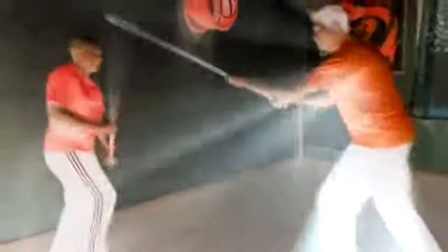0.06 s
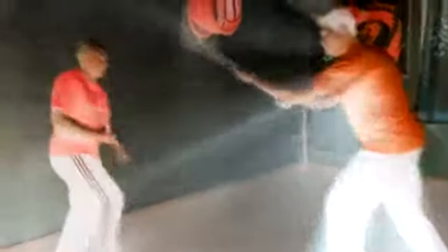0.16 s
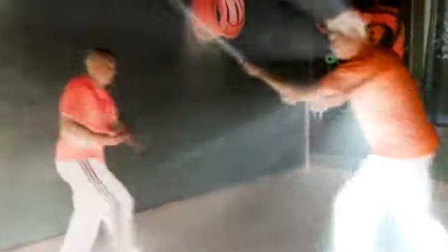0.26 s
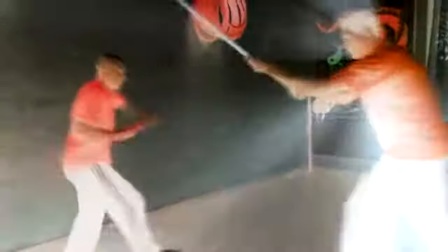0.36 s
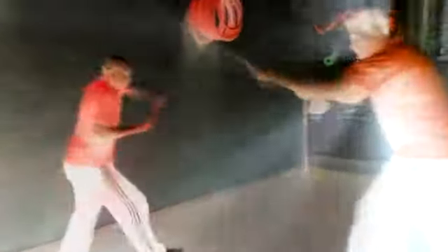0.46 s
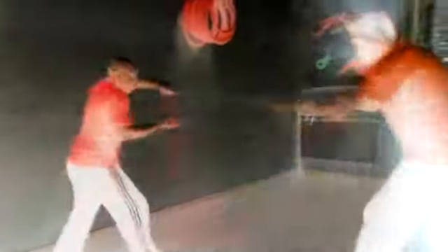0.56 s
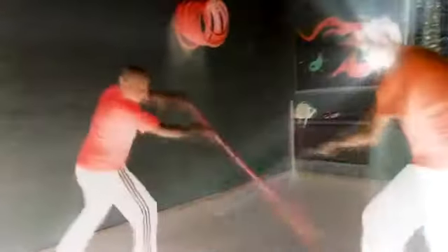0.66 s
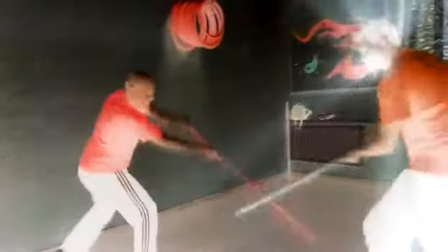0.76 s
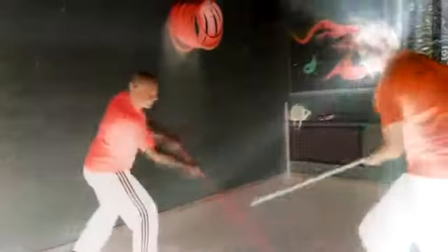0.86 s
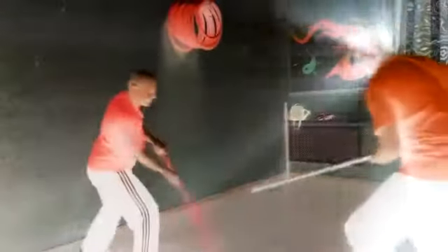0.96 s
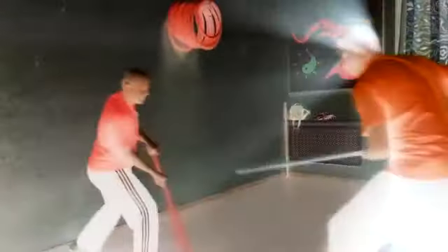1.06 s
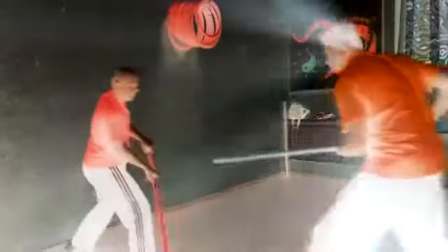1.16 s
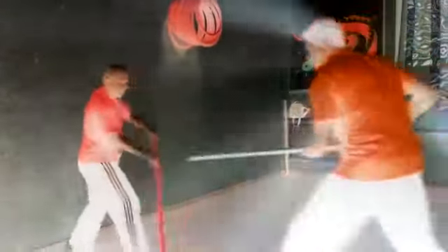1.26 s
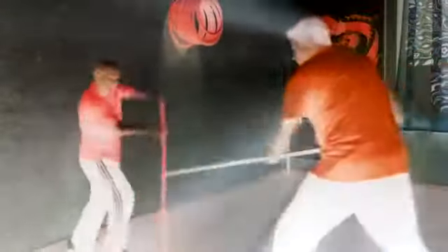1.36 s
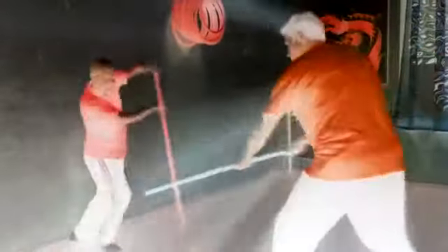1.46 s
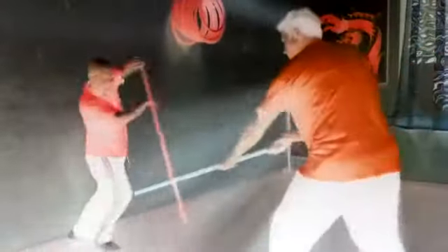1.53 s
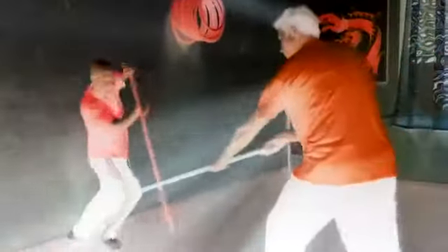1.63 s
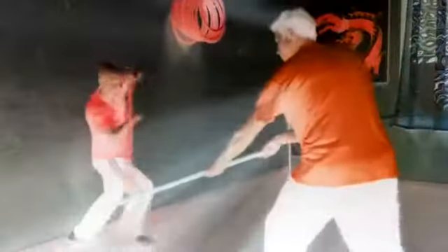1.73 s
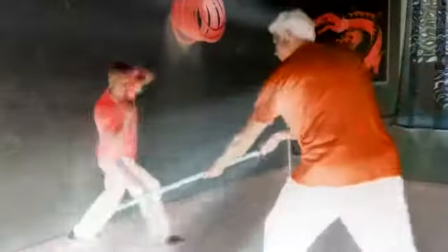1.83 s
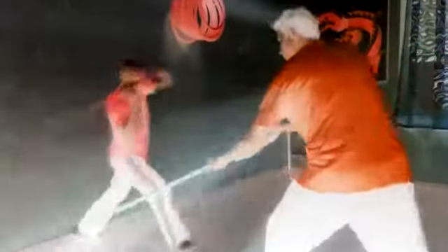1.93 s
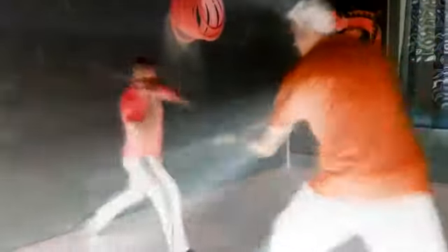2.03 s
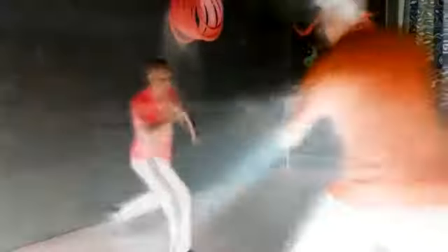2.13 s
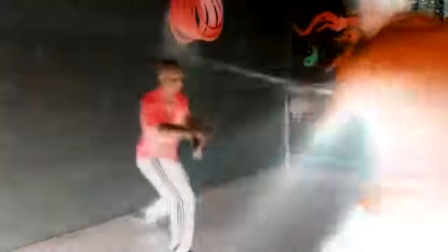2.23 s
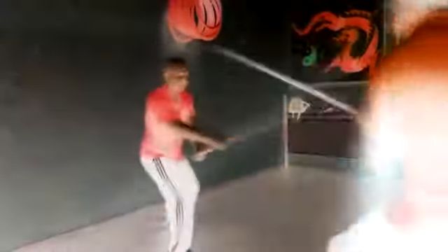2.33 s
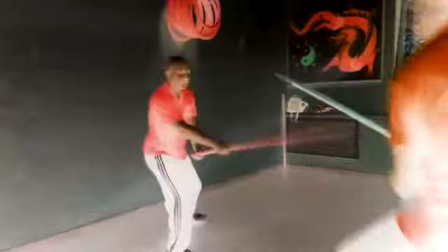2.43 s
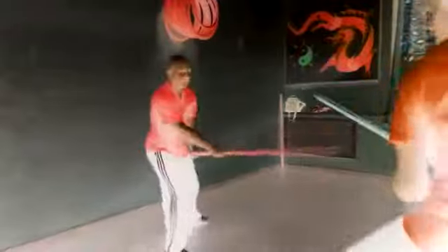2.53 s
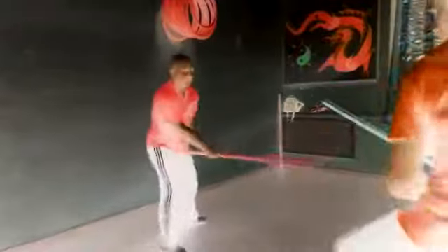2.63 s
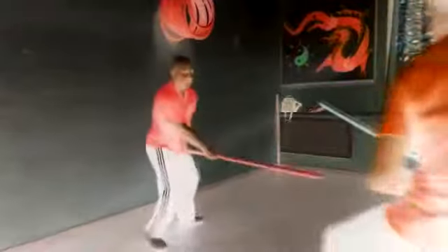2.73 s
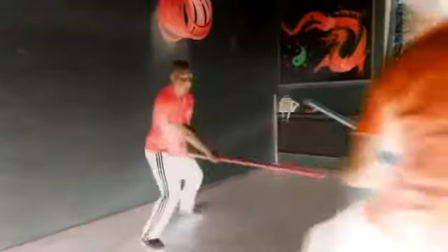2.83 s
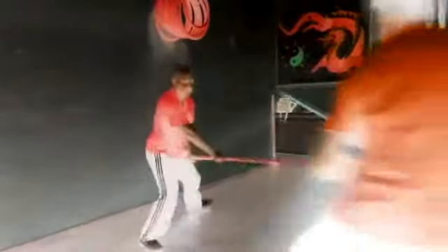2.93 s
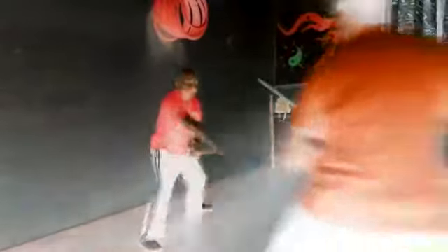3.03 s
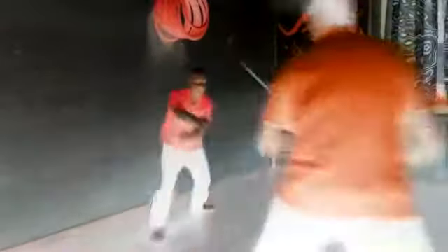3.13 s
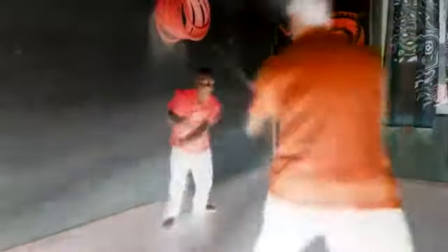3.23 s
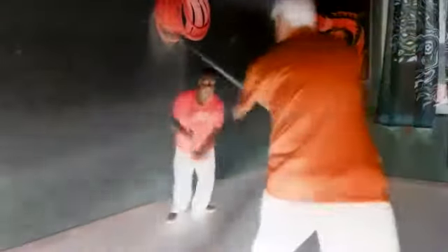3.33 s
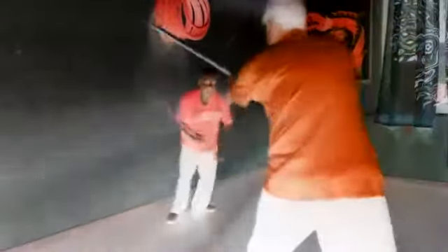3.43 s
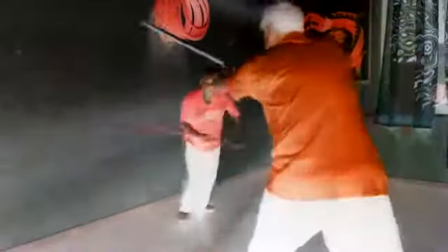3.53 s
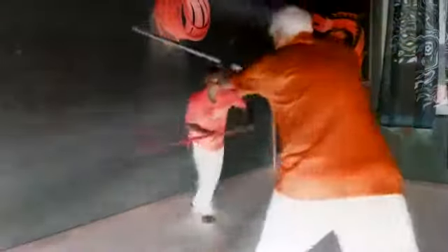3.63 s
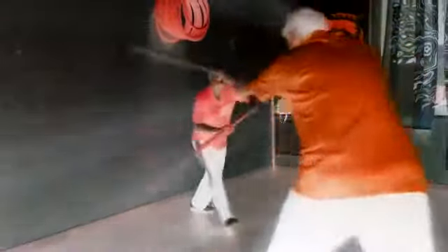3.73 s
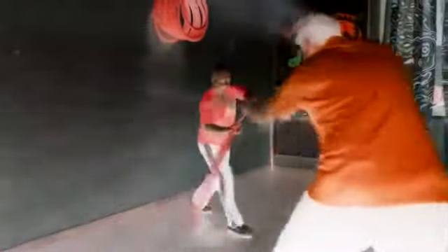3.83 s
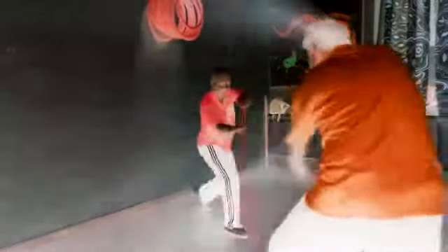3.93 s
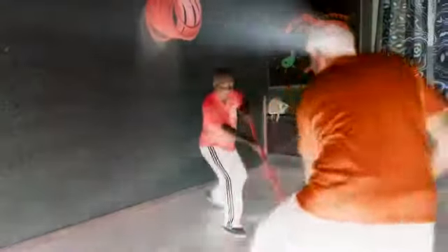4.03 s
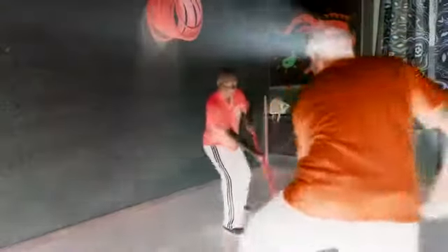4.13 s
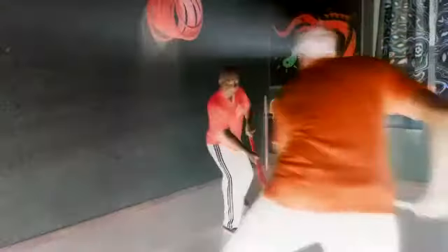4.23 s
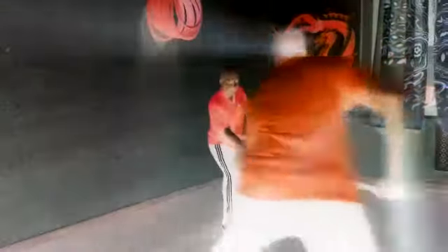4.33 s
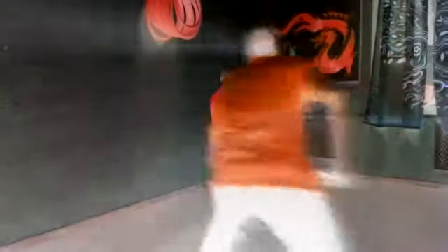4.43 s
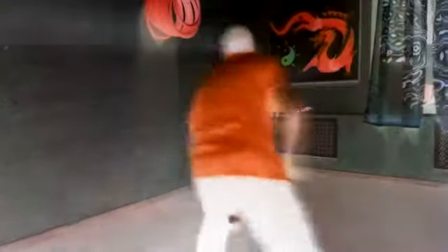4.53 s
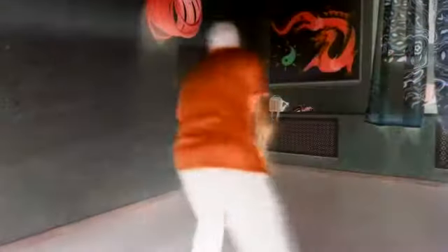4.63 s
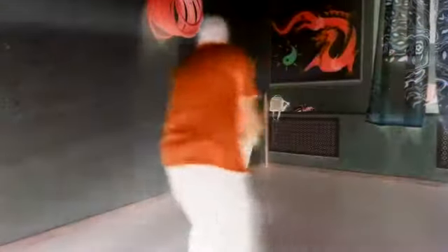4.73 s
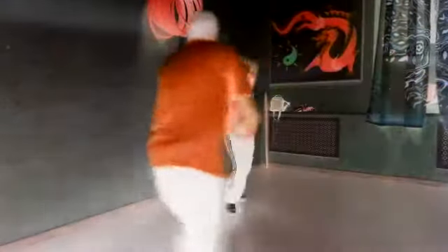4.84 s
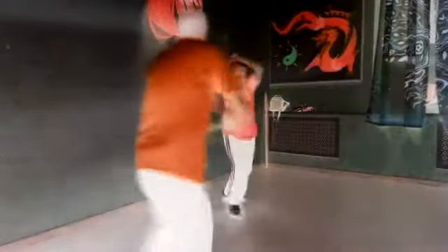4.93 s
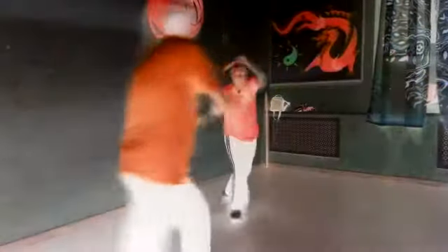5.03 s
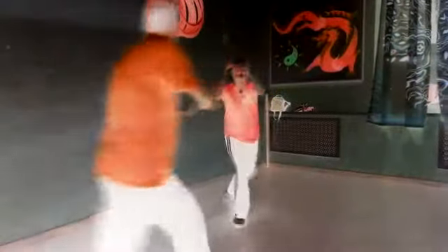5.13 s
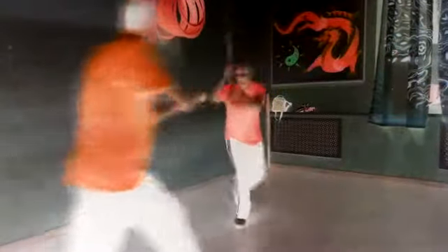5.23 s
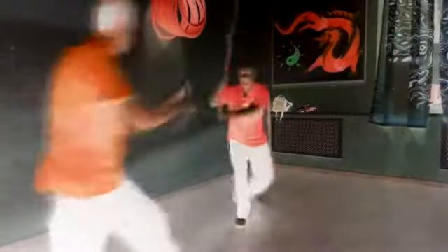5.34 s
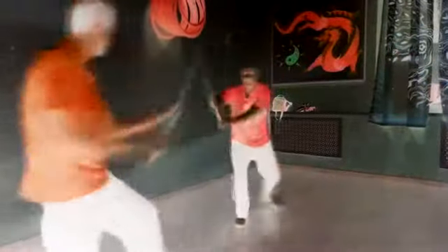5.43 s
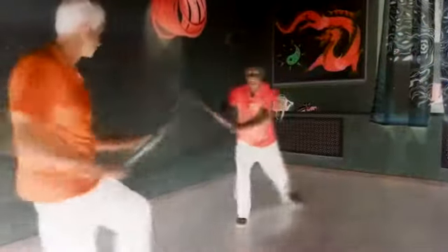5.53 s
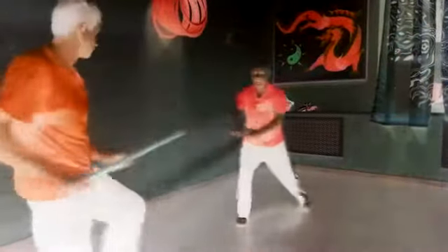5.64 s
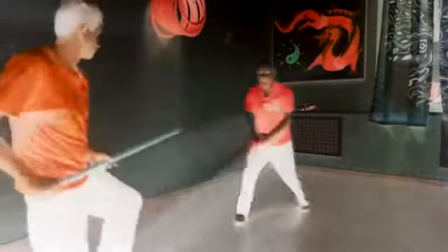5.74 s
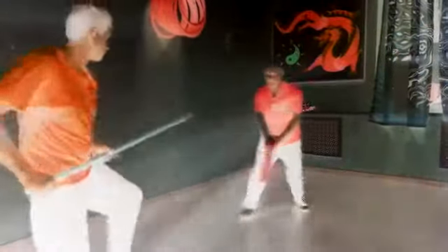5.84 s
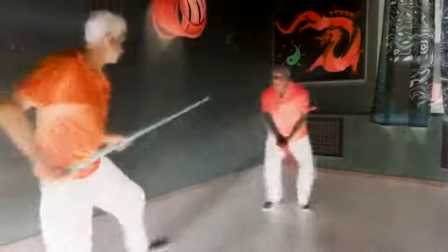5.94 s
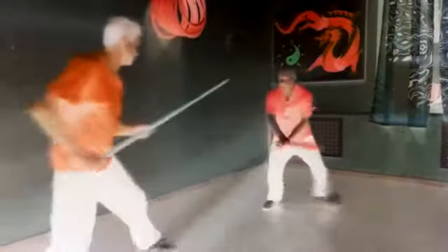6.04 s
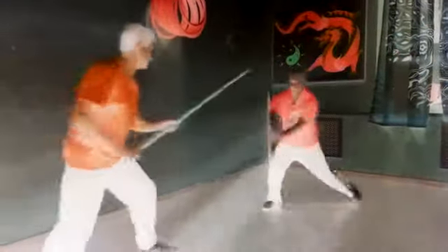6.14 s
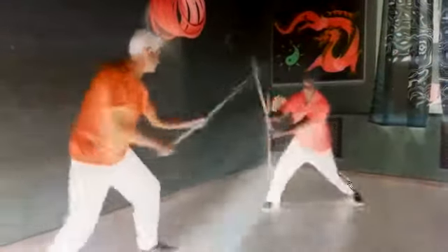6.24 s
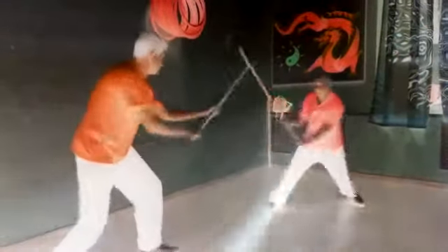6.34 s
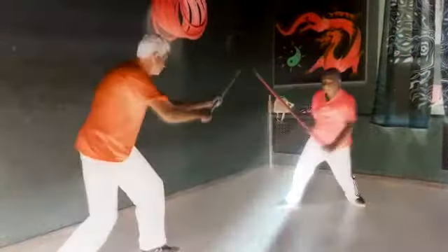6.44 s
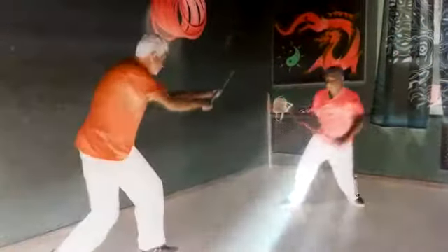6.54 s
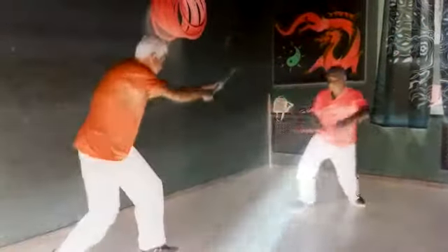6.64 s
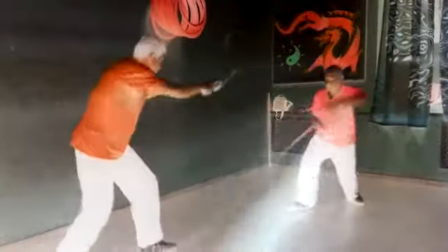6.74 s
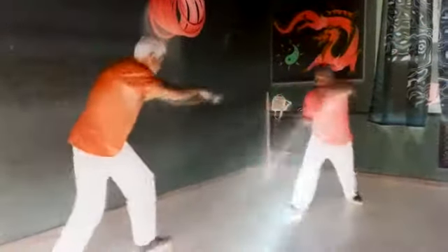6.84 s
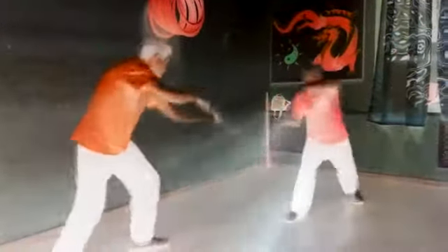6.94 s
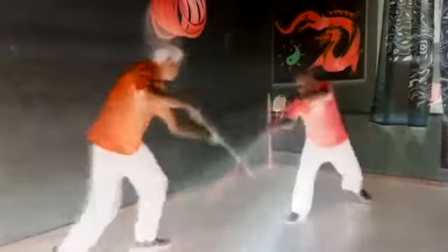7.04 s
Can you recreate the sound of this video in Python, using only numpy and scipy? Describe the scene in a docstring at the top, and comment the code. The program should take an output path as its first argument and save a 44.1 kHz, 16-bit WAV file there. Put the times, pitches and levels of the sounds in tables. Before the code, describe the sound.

Two people spar with long wooden sticks in a hard-walled hall, heard almost in mono over a very quiet background. At the start the room is already ringing from a block, and two lighter clacks follow at about 0.7 and 0.9 seconds. From 1 second, rubber soles pat, stamp and squeak on the smooth floor, mixed with faint sliding and swishes of cloth. Six hard, sharp stick blows land at roughly 2.3, 3.3, 4.0, 4.8, 5.5 and 6.3 seconds, each a bright wooden crack with a short reverberant tail; the last is slightly the strongest. Brief, high shoe chirps cluster between the blows and are loudest around 4 seconds, with a heavier stamp at 4.2. More steps and squeaks come near 5.2 and 6 seconds. A few final squeaks around 6.5 seconds and a soft step at 7 end the bout.

```python
"""Two people spar with long wooden sticks in a hard-walled hall, heard almost in mono.
The hall is already ringing from a block; two light clacks follow as feet slide and cloth swishes.
From 1 s rubber soles squeak by stick-slip friction and stamp on the smooth floor.
Between 2.3 and 6.3 s six hard blows excite the sticks' bending modes, each followed by reverberation;
the squeaks peak near 4 s. A few more squeaks and a soft step end the bout."""
import sys
import numpy as np
from scipy import signal
from scipy.io import wavfile
from scipy.ndimage import uniform_filter1d

SR = 44100
rng = np.random.default_rng(int(sys.argv[2]) if len(sys.argv) > 2 else 0)


def file_out(sig):
    """Save sig as 16-bit WAV at sys.argv[1]."""
    # one column per channel
    cols = np.atleast_2d(sig).T
    # limit, then scale
    lim = np.clip(cols, -1, 1)
    pcm = np.round(lim * 32767).astype(np.int16)
    wavfile.write(sys.argv[1], SR, pcm)


N = 312669
LEAD = SR // 4  # samples before time zero: the sparring is already under way

# background of the still room: (frequency [Hz], relative level [dB])
AIR_SPECTRUM = [(30, -5), (130, 0.5), (400, 7), (2000, -5.5), (4000, 2), (13000, -24)]
# stick on stick: (time [s], direct level [dB], hall level [dB], body below 1 kHz [dB],
# hardness near 3-6 kHz [dB], sizzle above 9 kHz [dB], knock centre [Hz], time the tail stays level [s])
BLOWS = [ (-0.055, -21, 1, 4, 2.5, 5, 2670, 0.091), (0.709, -10.5, 0, 0, 2.5, 7.5, 1920, 0.097),
         (0.933, -10, -15, -5, 8.5, -13, 2530, .01), (2.331, 2, 2, 0.5, -5.5, 2, 2040, 0.14),
         (3.256, 3.5, 6.5, -3, 7.5, 1, 2520, 0.088), (4.044, -1, 6, 1, 8, 9.5, 2300, 0.059),
         (4.751, 0.5, 5.5, .5, 9, 0.5, 2160, 0.039), (5.497, 2.5, 4.5, 0.5, -0.5, 5.5, 1540, 0.079),
         (6.321, 5, 7, -1, 8, -1, 2145, 0.05)]
# bending modes of the sticks: (frequency [Hz], relative level [dB])
BENDING_MODES = [(560, -29.5), (860, -6.5), (1110, -12), (1440, -2), (1660, 0), (1940, -4), (2330, 0),
                 (2580, -1)]
# contact pulse of wood on wood: (frequency [Hz], relative level [dB])
SNAP_SPECTRUM = [(40, -29.5), (150, -42), (280, -15.5), (600, -8.5), (1100, -3), (1600, 3), (2300, 4.5),
                 (3000, -8), (3800, -12), (5200, -12.5), (7200, -8), (9500, -20), (12000, -36),
                 (14000, -51)]
# first echoes off walls and ceiling: (delay [s], relative level [dB])
WALL_ECHOES = [(.0065, -3.5), (.0098, -2), (0.0216, -5), (.033, -4), (.043, -3)]
# decay of the hall before the extra fade of the highest treble: (frequency [Hz], time to fall 60 dB [s])
HALL_DECAY = [(150, 1.2), (300, 1.08), (700, 0.76), (1800, 0.53), (2600, 0.47), (4600, 0.47), (8000, 0.43),
              (13000, 0.57)]
# feet sliding with a swish of cloth: (start [s], duration [s], level [dB])
SLIDE_STROKES = [(0.654, 0.12, -66), (0.84, 0.26, -54), (1.3, 0.38, -46.5), (1.801, 0.13, -54),
                 (2.442, 0.17, -45), (3.068, 0.33, -54), (3.85, 0.17, -61), (4.505, 0.37, -55),
                 (5.274, 0.19, -59), (5.821, 0.46, -50.5), (6.504, 0.3, -60)]
# friction noise of feet and cloth: (frequency [Hz], relative level [dB])
SWISH_SPECTRUM = [(40, -42.5), (150, -28.5), (280, -4), (500, -2), (850, 9), (1200, 5.5), (2200, 9),
                  (3200, -23), (5000, -24.5), (8000, -34.5), (13000, -49.5)]
# soles sticking and slipping:
# (start [s], duration [s], first pitch [Hz], last pitch [Hz], level [dB], bite [0-1])
SOLE_SLIPS = [ (1.03, .013, 2120, 2010, -34.5, 0.63), (1.523, 0.084, 2200, 2397, -41, 0.66),
              (1.707, 0.0063, 2010, 1790, -37, 0), (2.573, .014, 2068, 2437, -30, 0.59),
              (2.583, 0.013, 2425, 2357, -30.5, 0.6), (2.719, 0.011, 2426, 2370, -34, 0.67),
              (2.796, .034, 1727, 1937, -34.5, 0.89), (2.819, 0.023, 1968, 2435, -27.5, 0.86),
              (3.18, .01, 2320, 2440, -45.5, .45), (3.201, 0.025, 3160, 2540, -42, 0.61),
              (3.221, 0.065, 2332, 2628, -29.5, 0.79), (3.328, 0.063, 1644, 1803, -25.5, 0.79),
              (3.378, 0.038, 2530, 2560, -18.5, 0.69), (3.385, 0.057, 1784, 1916, -26, .72),
              (3.78, 0.019, 2380, 2193, -36, 0.42), (3.989, 0.023, 1975, 1854, -20.5, 0.1),
              (4.003, 0.029, 1966, 1818, -13.5, 0.27), (4.019, 0.031, 2233, 2210, -26.5, 0.7),
              (4.235, 0.03, 2124, 2317, -16.5, 0.66), (4.239, 0.016, 1690, 1672, -30, 0.79),
              (4.641, .077, 2760, 2470, -32, 0.58), (4.673, 0.052, 2373, 2055, -35.5, .85),
              (5.168, 0.03, 1680, 1494, -42, 0.58), (5.318, 0.02, 1143, 1007, -47.5, .2),
              (5.885, 0.013, 2626, 2330, -41.5, 0.68), (5.967, .017, 2370, 2700, -34.5, 0.58),
              (5.978, 0.047, 2174, 1875, -32.5, 0.58), (6.017, 0.025, 2902, 3173, -32, 0.68),
              (6.029, 0.038, 2322, 2867, -28, .95), (6.498, 0.031, 2420, 2290, -31, 0.53),
              (6.522, 0.017, 2774, 2473, -24.5, 0.43), (6.538, 0.033, 2102, 1907, -30, 0.53),
              (6.614, 0.028, 1893, 1873, -37, .52), (7.007, 0.013, 2085, 1820, -51.5, 0.07)]
# scrape of a chattering sole: (frequency [Hz], relative level [dB])
RASP_SPECTRUM = [(100, -42.5), (600, -10), (1300, -16.5), (2200, 7.5), (3300, -27.5), (4700, -2.5),
                 (6000, -22.5), (7500, -23), (13000, -53.5)]
# landings, flatness negative on the heel and positive on the sole: (time [s], level [dB], flatness [dB])
FOOTFALLS = [(1.097, -17, -8.5), (1.226, -19.5, -1.5), (1.315, -18.5, -3), (1.735, -27, -14),
             (1.889, -27, 0), (2.047, -28, -1), (2.118, -18.5, 3.5), (2.201, -24.5, -1.5),
             (3.05, -25.5, -8), (3.76, -24.5, 1), (3.961, -20, 9.5), (4.2, -9, -3.5), (4.479, -17, -3.5),
             (5.192, -15, 8.5), (5.222, -18.5, 4), (5.767, -22.5, 1), (5.953, -21, 3.5), (6.263, -17, -5.5),
             (7.053, -29, 1.5)]
# impact of a sole on the floor: (frequency [Hz], relative level [dB])
SOLE_SPECTRUM = [(40, -26), (140, -18), (200, -7.5), (300, 5), (550, 5.5), (850, 10.5), (1300, 5),
                 (2200, 6), (3200, -24.5), (7000, -33.5), (13000, -60.5)]


def amp(db):
    """Amplitude grows tenfold for every 20 dB."""
    return 10 ** (np.asarray(db) / 20)


def unit(x):
    """Normalisation to an energy of 1."""
    return x / np.sqrt(np.sum(x ** 2) + 1e-20)


def curve(points, hz):
    """Interpolation of a table on a logarithmic frequency axis."""
    table_hz, value = np.transpose(points)
    return np.interp(np.log(hz + 1), np.log(table_hz + 1), value)


def shelf(hz, corner_hz):
    """A high-pass transition from 0 below the corner to 1 above it."""
    return 1 - 1 / (1 + (hz / corner_hz) ** 8)


def pulse(spectrum_db, size=2048):
    """Minimum phase gives the most compact causal pulse with a given spectrum."""
    log_gain = np.log(amp(spectrum_db(abs(np.fft.fftfreq(size, 1 / SR)))))
    return np.fft.ifft(np.exp(np.conj(signal.hilbert(log_gain)))).real


def noise(spectrum):
    """Linear filtering colours white noise and keeps its rms near 1."""
    colour = unit(pulse(lambda hz: curve(spectrum, hz)))
    return signal.oaconvolve(rng.standard_normal(N + LEAD), colour, "same")


def still_air(level_db=-102.5):
    """Stationary noise forms the faint background of the room."""
    return amp(level_db) * noise(AIR_SPECTRUM)


def stick_clacks(ring_t60_s=.035, chatter_s=.002, knock_db=2, mellow_db=-4, size=4096):
    """Impact excites bending modes, which vary with the grip and the point of contact."""
    out, t = np.zeros(N + LEAD), np.arange(size) / SR
    mode_hz, mode_db = np.transpose(BENDING_MODES)[:, :, None]
    damping = amp(-60 * t / ring_t60_s)
    radiation = signal.butter(2, 420, "high", fs=SR)  # the ring of the modes carries little bass
    snap = unit(pulse(lambda hz: curve(SNAP_SPECTRUM, hz), size=size))
    # less of the 3-6 kHz band travels straight to the listener than into the hall
    mellow = pulse(lambda hz: mellow_db * (shelf(hz, 2900) - shelf(hz, 5800)))
    for start, direct_db, hall_db, body_db, hard_db, sizzle_db, knock_hz, plateau_s in BLOWS:
        grip, place = rng.standard_normal((2, len(mode_hz), 1))
        modes = np.sign(place) * amp(mode_db) * np.sin(2 * np.pi * mode_hz * (1 + .03 * grip) * t)
        ring = signal.lfilter(*radiation, unit(damping * modes.sum(0)))
        contacts = rng.standard_normal(size) * np.exp(-t / chatter_s)
        chatter = unit(signal.fftconvolve(snap, contacts)[:size])
        crack_db = .45 * hard_db  # part of the hardness reaches 6-9 kHz
        colour = pulse(lambda hz: body_db * (1 - shelf(hz, 1000))
                       + knock_db * np.exp(-((hz - knock_hz) / 300) ** 2)
                       + hard_db * shelf(hz, 2600)
                       + (crack_db - hard_db) * shelf(hz, 5800)
                       + (sizzle_db - crack_db) * shelf(hz, 8800))
        direct = signal.fftconvolve(unit(snap + amp(-7) * chatter + amp(-1) * ring), colour)
        direct = signal.fftconvolve(direct, mellow)
        # the hall gathers sound from all directions, so single modes stand out less
        scattered = signal.fftconvolve(unit(snap + amp(-10) * ring), colour)
        add(out, start, amp(direct_db) * early_reflections(direct))
        add(out, start, amp(hall_db) * reverberation(scattered, plateau_s, gap_s=.009))
    return out


def early_reflections(x, floor_s=.0026, floor_db=-3, dull_hz=2800):
    """Multipath propagation: the direct sound, a floor bounce and duller echoes from the walls."""
    delay_s, level_db = np.transpose(WALL_ECHOES)
    stretch = rng.uniform(.94, 1.06, len(WALL_ECHOES) + 1)  # paths shift as the players move
    taps = np.zeros(SR // 10)
    taps[(delay_s * stretch[1:] * SR).astype(int)] = amp(level_db)
    taps = signal.lfilter(*signal.butter(2, dull_hz, fs=SR), taps)
    taps[0] = 1
    taps[int(floor_s * SR * stretch[0])] += amp(floor_db)
    return signal.fftconvolve(x, unit(taps))


def reverberation(x, plateau_s, gap_s=.0057, early_db=4, early_s=.068, size=256):
    """Reverberation stays level briefly, as under a recorder's gain control, then decays, treble first."""
    hz, t = np.fft.rfftfreq(size, 1 / SR)[:, None], np.arange(0, SR, size // 2) / SR
    field = rng.standard_normal((len(hz), 2 * len(t))).view(complex)
    level_db = -60 * np.maximum(t - plateau_s, 0) / curve(HALL_DECAY, hz)
    level_db += early_db * np.exp(-t / early_s) * (1 - shelf(hz, 3200))  # dull wave off near surfaces
    level_db -= 32 * t * (hz / 10400) ** 2  # the highest treble of the tail dies away sooner
    tail = signal.istft(field * amp(level_db), nperseg=size)[1]
    tail *= np.clip(np.arange(len(tail)) / (gap_s * SR) - .5, 0, 1)
    return unit(signal.fftconvolve(x, tail)) * np.linalg.norm(x)


def add(mix, start, sound):
    """Superposition: a sound joins the mix at its start time in seconds."""
    part = mix[max(LEAD + round(start * SR), 0):][:len(sound)]
    part += sound[:len(part)]


def shuffles(direct_db=-3, hall_db=-2, uneven_db=2.5, smoothing=700):
    """Sliding friction of feet and cloth makes noise in uneven strokes that swell and fade."""
    out, swish = np.zeros(N + LEAD), noise(SWISH_SPECTRUM)
    unevenness = uniform_filter1d(rng.standard_normal(len(swish)), smoothing) * np.sqrt(smoothing)
    swish *= amp(uneven_db * unevenness)
    for start, duration, level_db in SLIDE_STROKES:
        stroke = swish[round(start * SR):][:int(duration * SR)]
        stroke = amp(level_db) * stroke * signal.windows.tukey(len(stroke), .8)
        add(out, start, amp(direct_db) * stroke)
        add(out, start, amp(hall_db) * reverberation(stroke, plateau_s=.02))
    return out


def sole_squeaks(direct_db=-3, hall_db=-2, flutter=.31, rasp_db=-9, lock_db=-19):
    """Stick-slip oscillation: rubber catches and lets go about 2000 times a second in a gliding tone."""
    out = np.zeros(N + LEAD)
    scrape = unit(pulse(lambda hz: curve(RASP_SPECTRUM, hz)))
    smoother = unit(np.hanning(72))[None]
    for start, duration, first_hz, last_hz, level_db, bite in SOLE_SLIPS:
        size = int(duration * SR)
        # bite makes the slipping irregular; above lock_db it settles onto one clean pitch
        roughness = (.12 + bite ** 3.2) / np.hypot(1, amp(level_db - lock_db))
        white = rng.standard_normal((3, SR // 4))
        wobble, grip = signal.fftconvolve(white[:2], smoother, "same")[:, :size]
        pitch_hz = np.linspace(first_hz, last_hz, size) * (1 + .11 * roughness * wobble)
        phase = 2 * np.pi * np.cumsum(pitch_hz) / SR
        # a harder slip has sharper corners, hence stronger harmonics
        second = amp(-36.5 + 34 * bite) * np.sin(2 * phase)
        upper = amp(-20.5 + .64 * level_db) * (np.sin(3 * phase) + amp(-11.5) * np.sin(4 * phase))
        tone = (np.sin(phase) + second + upper) * np.exp(flutter * roughness * grip)
        rasp = amp(rasp_db) * roughness * signal.fftconvolve(white[2, :size], scrape)[:size]
        chirp = (tone + rasp) * signal.windows.tukey(size, .7)
        chirp = amp(level_db) * np.sqrt(size) * unit(chirp)
        add(out, start, amp(direct_db) * chirp)
        add(out, start, amp(hall_db) * reverberation(chirp, plateau_s=.0068, gap_s=.0067))
    return out


def footsteps(direct_db=1.5, hall_db=4, contact_s=.0032, size=2048):
    """An impact of a few milliseconds makes a dull pat: the heel thuds, the flat sole slaps."""
    out, t = np.zeros(N + LEAD), np.arange(size) / SR
    for start, level_db, flat_db in FOOTFALLS:
        thud_db, slap_db = -.5 * flat_db, .69 * flat_db
        colour = unit(pulse(lambda hz: curve(SOLE_SPECTRUM, hz)
                            + thud_db * (1 - shelf(hz, 620)) + slap_db * shelf(hz, 1400)))
        contact = rng.standard_normal(size) * np.exp(-t / contact_s)
        pat = unit(early_reflections(signal.fftconvolve(contact, colour)))
        add(out, start, amp(level_db + direct_db) * pat)
        add(out, start, amp(level_db + hall_db) * reverberation(colour, plateau_s=.0082))
    return out


def scene(side_db=-24, size=300):
    """The sources superpose; scattered sound reaches two close microphones slightly out of phase."""
    mid = stick_clacks() + sole_squeaks() + footsteps() + shuffles() + still_air()
    scatter = rng.standard_normal(size) * np.hanning(size)
    quadrature = unit(np.r_[-scatter[::-1], 0, scatter])  # odd symmetry shifts phase by 90 degrees
    side = amp(side_db) * signal.oaconvolve(mid, quadrature, "same")
    return np.array([mid + side, mid - side])[:, LEAD:]


def record(dry, cutoff_hz=14000):
    """Band limiting: a linear-phase low-pass filter removes the highest treble."""
    low_pass = signal.firwin(401, cutoff_hz, window=("kaiser", 9), fs=SR)
    return signal.oaconvolve(dry, low_pass[None], "same")


dry = scene()
out = record(dry)
file_out(out)
```